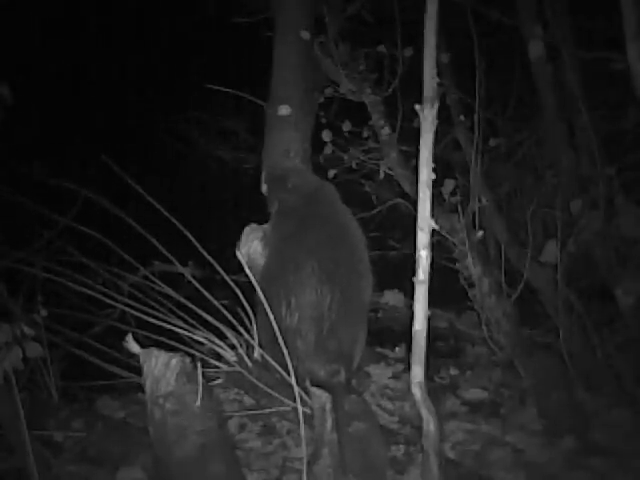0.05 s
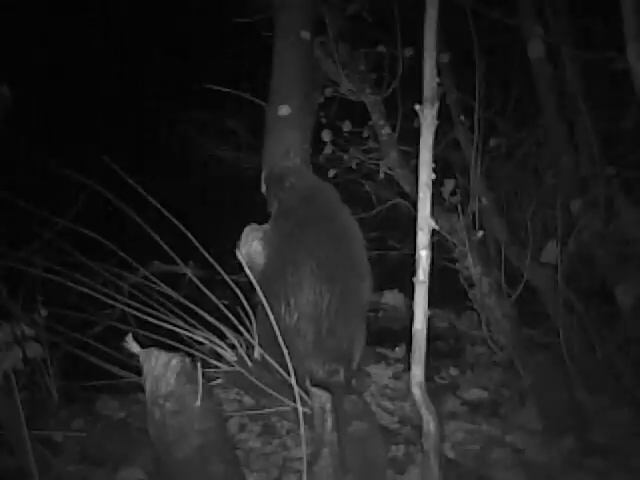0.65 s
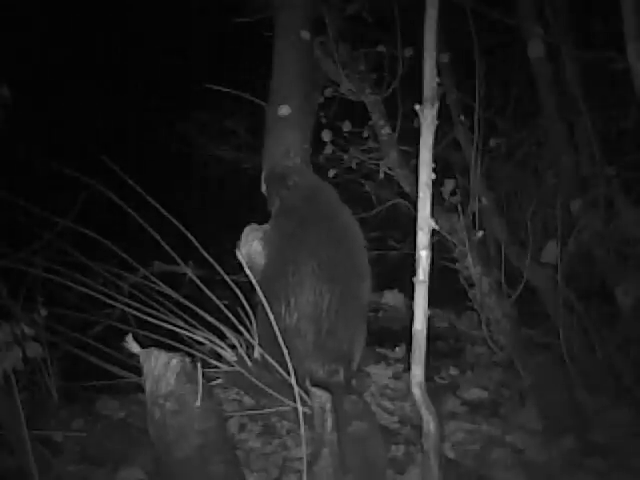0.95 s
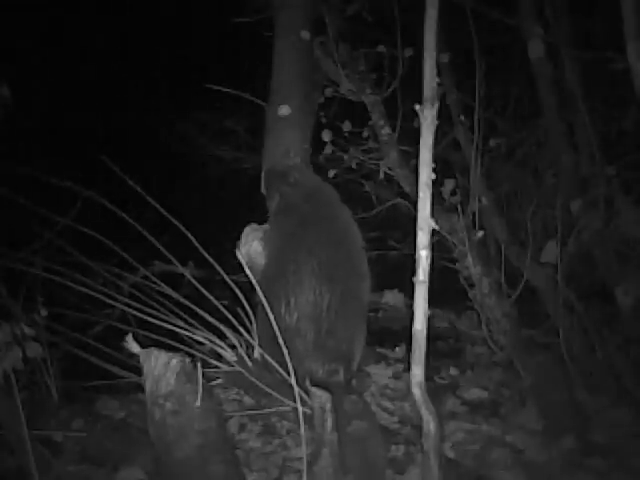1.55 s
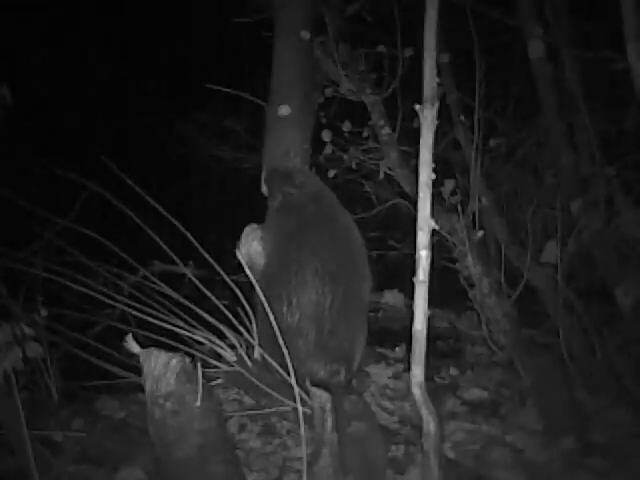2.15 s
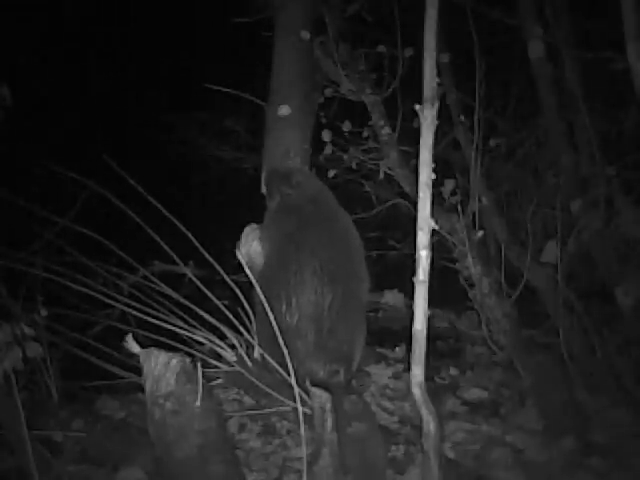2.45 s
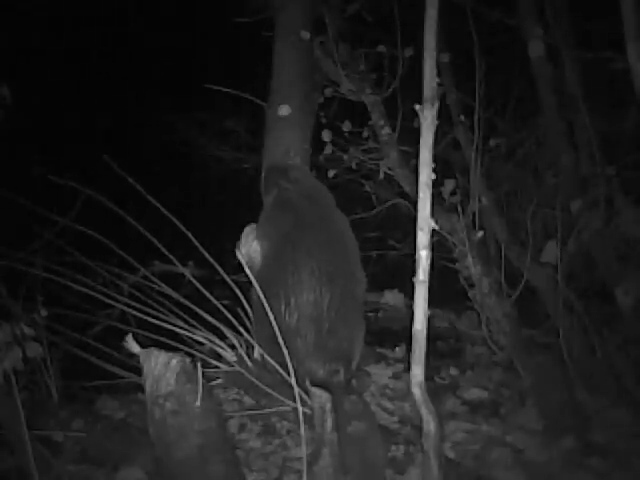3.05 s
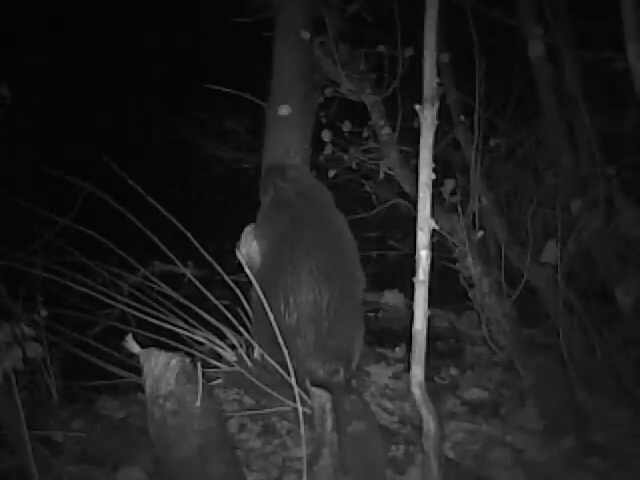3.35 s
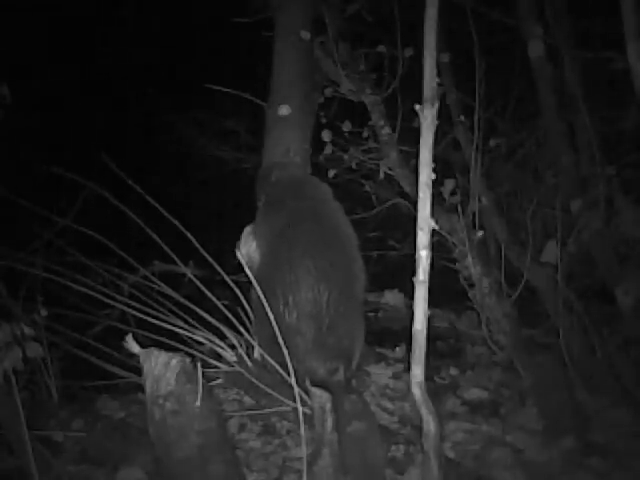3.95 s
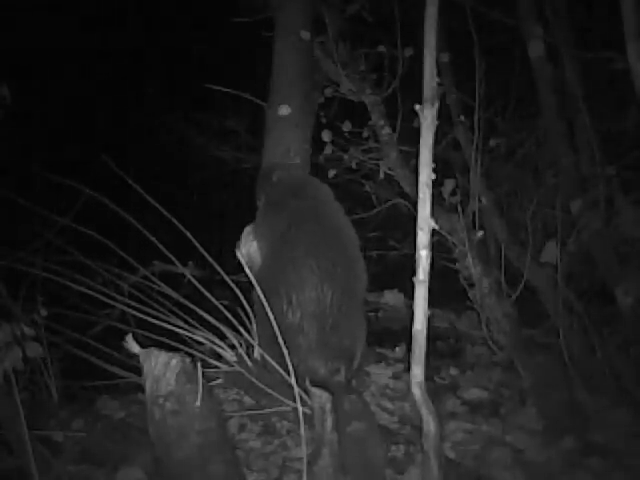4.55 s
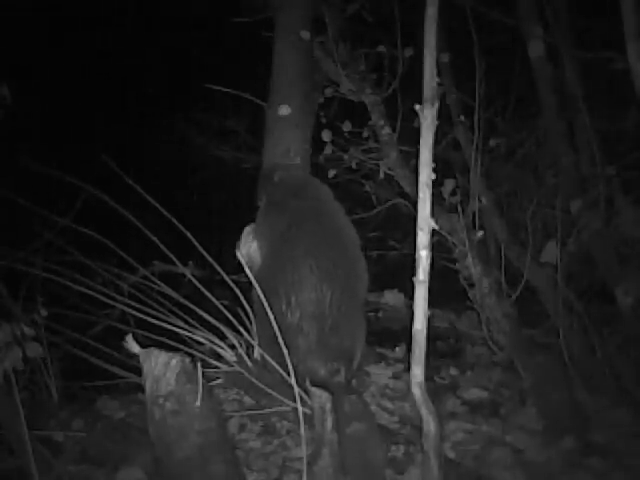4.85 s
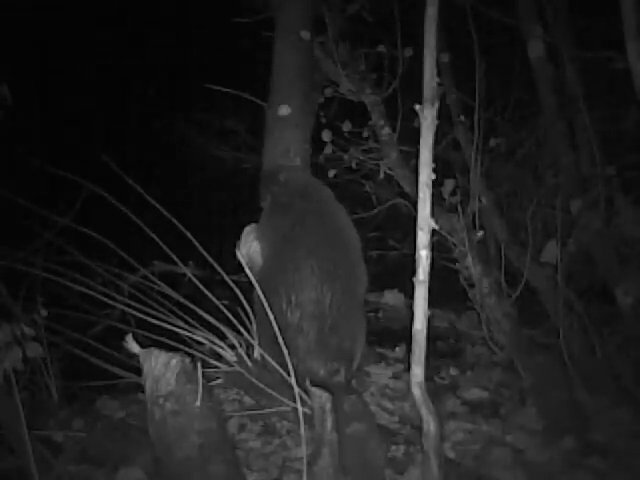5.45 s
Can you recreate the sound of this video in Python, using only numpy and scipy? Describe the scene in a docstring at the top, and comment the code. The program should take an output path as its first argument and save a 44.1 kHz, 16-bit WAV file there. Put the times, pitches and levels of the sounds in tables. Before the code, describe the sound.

From start to finish, about five and a half seconds, a trail camera's own electrical noise is in front. A mid-pitched whine flutters about twelve times a second, with very fast ticking and short buzzes about five times a second. Under it lies a steady bright hiss with very faint thin whistles. A coarser buzzing chatter comes in the first 0.4 seconds.

Some metres away in the night woods, a beaver faintly gnaws a standing trunk. Its teeth rasp continuously, with longer scrapes near 3.7, 4.0 and 5.3 seconds. Wood fibres snap in tiny crackles at the start and around 1.4, 2.1, 4.0 and 5.0 seconds. The trunk gives soft low thuds, mostly in the first 1.7 seconds and between 3.4 and 4.7. Dry, sharp clicks stand out close to the microphone, clearest near 0.3, 1.1, 2.5, 3.5 and 4.7 seconds. The highest treble is missing.

```python
"""Woodland at night, on a trail camera's microphone, some metres from a beaver gnawing a standing trunk.
The beaver is faint: fibres splinter, teeth rasp and the trunk thuds low. A few dry clicks stand out.
In front, and louder, are the camera's own electronics: each draw of current dips the supply and leaks
into the microphone line, as a whine that pauses between picture frames, a fast ticking and short
buzzes of card writes, all over a steady hiss."""
import sys
import numpy as np
from scipy import signal
from scipy.fft import rfft, irfft, next_fast_len
from scipy.io import wavfile
from scipy.ndimage import uniform_filter1d, map_coordinates

SR = 44100
rng = np.random.default_rng(int(sys.argv[2]) if len(sys.argv) > 2 else 0)


def generate_wav(signal):
    """Clip the signal to [-1, 1] and save it as 16-bit WAV at the path in sys.argv[1]."""
    frames = np.transpose(np.atleast_2d(signal))
    scaled = np.clip(frames, -1, 1) * 32767
    pcm = np.round(scaled).astype(np.int16)
    wavfile.write(sys.argv[1], SR, pcm)


N = 246959
TIME = np.arange(N) / SR
LINE_HZ = 767.045  # the sensor's line rate
FRAME_HZ, FIRST_FRAME_S = LINE_HZ / 64, .0222

# tone of the hiss, the teeth's rasp and the trunk's thud: (frequency [Hz], gain [dB])
HISS_SPECTRUM = [(20, 6.5), (200, -3), (1000, -5.5), (2000, -3), (3200, 7.5), (5000, 6.5), (7500, 4)]
RASP_SPECTRUM = [(60, -16), (150, -3), (350, -2), (550, 0.5), (1000, -3), (1500, -10), (2500, -15.5),
                 (6000, -35)]
THUD_SPECTRUM = [(20, -5.5), (50, -13), (85, 11.5), (110, 2), (150, -10.5), (400, -36), (1500, -83.5)]
# longer scrapes of the teeth, and hard tugs that shake the trunk: (time [s], level [dB])
TOOTH_SCRAPES = [(3.69, -52), (4.01, -54), (5.32, -45.5)]
TRUNK_TUGS = [(.07, -40), (.36, -46), (.58, -45), (.785, -40.5), (1.05, -39.5), (1.235, -38), (1.38, -42),
              (1.70, -42), (2.36, -43), (3.36, -42), (3.70, -34.5), (3.92, -41), (4.02, -38), (4.37, -41.5),
              (4.46, -39.5), (4.74, -38), (5.35, -42.5)]
# wood fibres giving way under the teeth: (time [s], level [dB], pitch [Hz])
FIBRE_SNAPS = [(0.0540, -51.5, 4250), (0.56, -59, 4150), (1.377, -55, 4900), (1.664, -59, 5060),
               (2.1255, -54.5, 4180), (3.460, -62, 5800), (4.006, -50.5, 5650), (4.711, -57, 5230),
               (5.0194, -53.5, 4700), (5.3018, -58, 4880)]
# single sharp clicks: (time [s], relative level [dB])
DRY_CLICKS = [(0.284, -35), (0.7163, -42), (0.9682, -46), (1.1293, -35.5), (1.7574, -39), (1.993, -37),
              (2.4978, -32), (2.8451, -38.5), (3.5176, -35), (3.832, -43), (3.9098, -40.5), (4.6793, -34.5),
              (4.7233, -37), (4.972, -40)]
# the power converter's whistles: (frequency [Hz], level [dB])
CONVERTER_TONES = [(4000, -68), (6136.4, -70)]
# the sensor's whine: (harmonic [multiple of the line rate], level [dB])
LINE_HARMONICS = [(1, -36.5), (2, -47.5), (3, -59), (4, -71), (6, -76.5)]
# the processor flat out: (time [s], length [s], rate [draws/s], relative level [dB], unevenness [0-1])
BUSY_RUNS = [(0.114, 0.037, 620, -20, 0.5), (0.197, 0.017, 500, -19.5, 0.34),
             (0.273, 0.0049, 260, -16, 0.14)]
# card writes that open the file: (time [s], data blocks [count], relative level [dB])
FILE_OPENING = [(0.0306, 1, -20.5), (0.1589, 3, -22.5), (0.2833, 1, -20), (0.3058, 3, -22.5),
                (0.3653, 1, -21)]
# spells when the card is slow: (start [s], end [s])
SLOW_CARD_SPELLS = [(.6, 1.3), (1.5, 2.3), (3.0, 3.4), (4.0, 4.6), (5.5, 5.6)]
# how ticks and switched currents reach the microphone line: (frequency [Hz], gain [dB])
TICK_LEAK = [(30, -18.5), (150, -9.5), (350, 1.5), (700, 1), (1100, -2.5), (2000, -12.5), (4000, -26),
             (7000, -31)]
SUPPLY_LEAK = [(5, 3.5), (25, -9.5), (70, -13.5), (200, -2), (400, -5.5), (620, -2), (1000, -4.5),
               (1600, -13), (3000, -25), (7000, -18)]
# treble roll-off of the camera's sound channel: (frequency [Hz], gain [dB])
CHANNEL_RESPONSE = [(7200, -1), (7800, -3.5), (8300, -11.5), (8800, -27), (9300, -44), (10000, -72.5)]


def amp(db):
    """Decibels to gain."""
    return 10 ** (np.asarray(db) / 20)


def unit(x):
    """Scale to rms 1."""
    return x / np.sqrt(np.mean(x ** 2) + 1e-20)


def along(points, hz):
    """(Hz, value) points read on a log axis."""
    f, v = np.transpose(points)
    return np.interp(np.log(hz + 1), np.log(f + 1), v)


def filtered(x, response):
    """x times a response of frequency."""
    m = next_fast_len(N + SR // 4)
    return irfft(rfft(x, m) * response(np.fft.rfftfreq(m, 1 / SR)), m)[:N]


def coloured(x, colour, size=8192):
    """x through a causal filter with the given (Hz, dB) shape."""
    cepstrum = irfft(np.log(amp(along(colour, np.fft.rfftfreq(size, 1 / SR)))))
    cepstrum[1:size // 2] *= 2
    cepstrum[size // 2 + 1:] = 0
    return signal.fftconvolve(x, irfft(np.exp(rfft(cepstrum))))[:N]


def noise(colour):
    """Coloured noise of rms 1."""
    return unit(coloured(rng.standard_normal(N), colour))


def impulses(times, sizes):
    """Impulses, each shared between its two nearest samples."""
    at = np.clip(np.asarray(times) * SR, 0, N)
    i = at.astype(int)
    return (np.bincount(i, sizes * (1 - at + i), N + 2) + np.bincount(i + 1, sizes * (at - i), N + 2))[:N]


def add(track, s, sound):
    """Mix a sound into the track from time s."""
    part = track[max(round(s * SR), 0):][:len(sound)]
    part += sound[:len(part)]


def wobble(rate):
    """A smooth random curve, rate knots a second."""
    return map_coordinates(rng.standard_normal(int(N * rate / SR) + 4), [TIME * rate])


def swells(events, rise, fall):
    """Each (s, dB) event swells to its peak and dies away."""
    return sum(amp(db) * np.exp(-np.maximum((s - TIME) / rise, (TIME - s) / fall)) for s, db in events)


def flicker(samples):
    """Random flutter of rms 1, smoothed over so many samples."""
    return unit(uniform_filter1d(rng.standard_normal(N), size=samples))


def hiss(level_db=-55):
    """A steady, bright hiss lies under everything."""
    return amp(level_db) * noise(HISS_SPECTRUM)


def converter_whistles():
    """The power converter gives off thin, steady tones."""
    return sum(amp(db) * np.sqrt(2) * np.sin(2 * np.pi * hz * TIME) for hz, db in CONVERTER_TONES)


def gnawing(rasp_db=-47.5, shake_db=-51.5, grain_db=2):
    """Some metres off, teeth rasp over the wood; the trunk shakes lightly and thuds at each tug."""
    effort = wobble(rate=8)
    grain = amp(grain_db * flicker(260))
    rasp = np.hypot(amp(rasp_db + .73 * effort), swells(TOOTH_SCRAPES, rise=.015, fall=.03))
    thud = np.hypot(amp(shake_db + 3 * effort), swells(TRUNK_TUGS, rise=.034, fall=.045))
    return rasp * unit(grain * noise(RASP_SPECTRUM)) + thud * noise(THUD_SPECTRUM)


def splinters(spread_s=.022, cluster_t60_s=.06, fibre_t60_s=.0019, fibres=26):
    """A bite snaps a cluster of fibres, the first ones hardest; each rings briefly at its own pitch."""
    track, t = np.zeros(N), np.arange(SR // 32) / SR
    for s, db, hz in FIBRE_SNAPS:
        size_db = rng.normal(0, 3, (fibres, 1))
        pitch_hz = hz * np.exp(rng.normal(0, .13, (fibres, 1)))
        start = spread_s * rng.random((fibres, 1)) ** 1.6
        age = np.maximum(t - start, 0)
        fall = amp(size_db - 60 * start / cluster_t60_s - 60 * age / fibre_t60_s)
        crack = np.sum(fall * np.sin(2 * np.pi * pitch_hz * age), axis=0)
        add(track, s, amp(db) * unit(crack))
    return track


def clicks(gain_db=15):
    """Single clicks, dry and sharp at the microphone."""
    times, db = np.transpose(DRY_CLICKS)
    spikes = impulses(times, -amp(db + gain_db))
    return coloured(spikes, [(300, 13), (1500, 5.5), (4000, .5), (7500, -7)])


def sensor_whine(pause_s=.0054, restart_share=.23, half_ramp_s=.0086, flutter_db=1.5):
    """Sensor lines dip the supply; the readout rests between frames and restarts softly."""
    since_restart = (TIME - FIRST_FRAME_S) % (1 / FRAME_HZ) - pause_s
    ramp = np.clip(restart_share + since_restart / (2 * half_ramp_s), 0, 1)
    readout = uniform_filter1d((since_restart > 0) * ramp, size=30)
    dips = -sum(amp(db) * np.sqrt(2) * np.cos(2 * np.pi * k * LINE_HZ * TIME)
                for k, db in LINE_HARMONICS)
    return dips * readout * amp(flutter_db * flicker(200))


def processor_ticks(period_s=.0079, delay_s=.0026, dip_db=-5, edge_db=-46, count=760):
    """The processor wakes about every 8 ms, at times later; some wakings have a sharp edge."""
    lateness, jitter, size, sharpness = rng.standard_normal((count, 4)).T
    times = np.cumsum(period_s + delay_s * (lateness > .6) + .0004 * jitter)
    dips = coloured(impulses(times, -amp(dip_db + 1.7 * size)), TICK_LEAK)
    edges = impulses(times, -amp(edge_db + 5 * np.minimum(sharpness, 1.8)))
    return dips + edges


def supply(edges, steps):
    """Current switching on and off, as it leaks into the microphone line."""
    return coloured(np.cumsum(impulses(np.concatenate(edges), np.concatenate(steps))), SUPPLY_LEAK)


def processor_chatter(draw_s=.00042, count=32):
    """Quick, uneven runs of short draws of current merge into a coarse buzz."""
    edges, steps = [], []
    for s, length, rate, db, unevenness in BUSY_RUNS:
        slip, size_db = rng.standard_normal((2, count))
        age = np.abs(np.arange(count) + unevenness * slip) / rate
        current = amp(db + size_db) * np.clip((length - age) * rate, 0, 1)
        edges += [s + age, s + age + draw_s]
        steps += [-current, current]
    return supply(edges, steps)


def write_schedule(first_full_frame=6.5, frames_per_save=2.5, early_saves=(1, 9), creep_s=.00011):
    """The picture buffer is saved as it fills: (time [s], blocks [count], relative level [dB])."""
    writes = list(FILE_OPENING)
    for n in range(25):
        frame = int(first_full_frame + n * frames_per_save) - (n in early_saves)
        frame_s = FIRST_FRAME_S + frame / FRAME_HZ
        save_s = frame_s + .0202 - n * creep_s  # each save comes a little sooner in its frame
        writes.append((save_s, 3, -21.5))
        # a one-block index update follows; on a slow card it waits for the next frame
        if any(start < frame_s < end for start, end in SLOW_CARD_SPELLS):
            writes.append((frame_s + 1 / FRAME_HZ + .0093, 1, -20.5))
        else:
            writes.append((save_s + .0228, 1, -22.5))
    return writes


def card_writes(gain_db=5, block_s=.004997, data_s=.0019, reply_at_s=.003034, reply_s=.00079):
    """After a command, each block draws current twice: long for the data, short for the reply."""
    edges, steps = [], []
    for s, blocks, db in write_schedule():
        starts = s + block_s * np.arange(blocks)
        # draws: (time [s], length [s], share of the full current [0-1])
        command = (s - .002506, .0014, .43)
        closing = (starts[-1] + block_s, reply_s, .41)
        data = [(start, data_s, 1) for start in starts]
        replies = [(start + reply_at_s, reply_s, 1) for start in starts]
        on, length, share = np.transpose([command, closing] + data + replies)
        on_jitter, off_jitter, size_db = (rng.standard_normal((len(on), 3)) * [.0001, .0001, 1]).T
        current = share * amp(db + gain_db + size_db)
        edges += [on + on_jitter, on + length + off_jitter]
        steps += [-current, current]
    return supply(edges, steps)


def scene():
    """One microphone: the distant beaver under the camera's own noises."""
    beaver = splinters() + gnawing()
    camera = sensor_whine() + processor_ticks() + processor_chatter() + card_writes()
    return (hiss() + converter_whistles() + beaver + clicks() + camera)[None]


def record(dry, dc_offset=-.58, top_hz=9600):
    """The camera's narrow sound channel rolls off near 8 kHz, and its signal rests off centre."""
    narrowed = filtered(dry[0], lambda hz: amp(along(CHANNEL_RESPONSE, hz)) * (hz < top_hz))
    return dc_offset + narrowed[None]


dry = scene()
out = record(dry)
generate_wav(out)
```